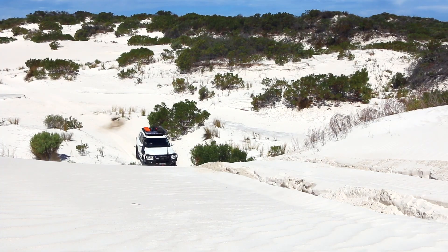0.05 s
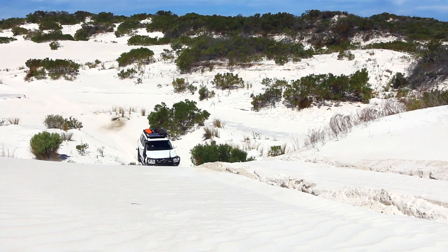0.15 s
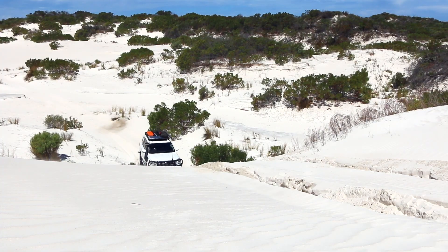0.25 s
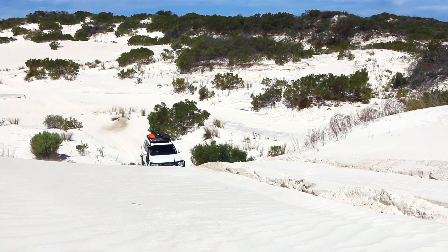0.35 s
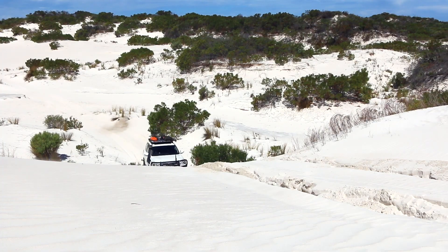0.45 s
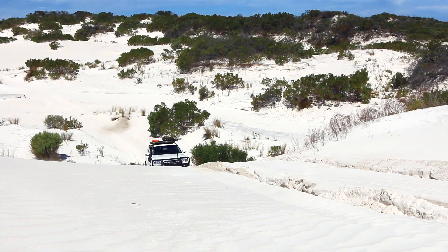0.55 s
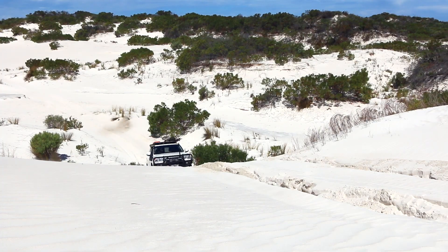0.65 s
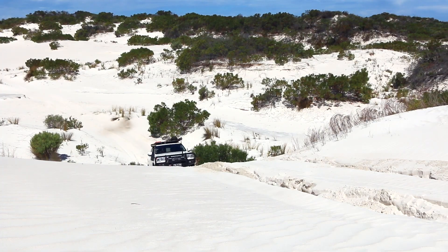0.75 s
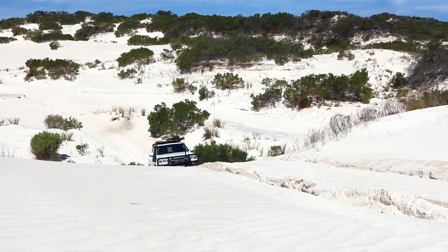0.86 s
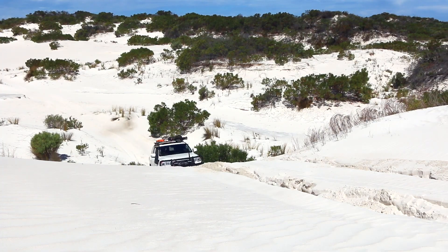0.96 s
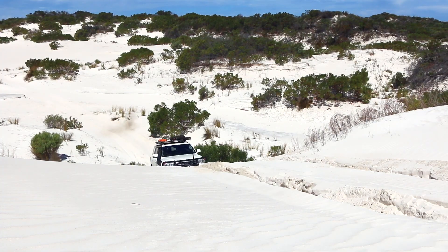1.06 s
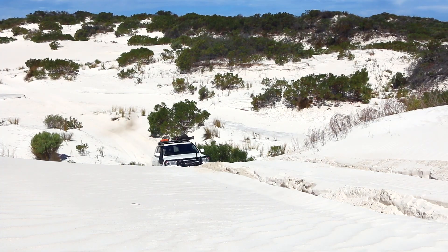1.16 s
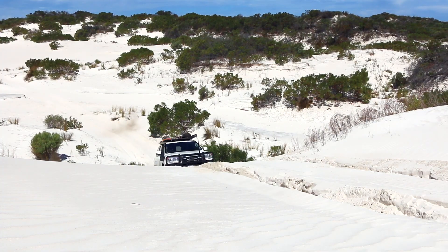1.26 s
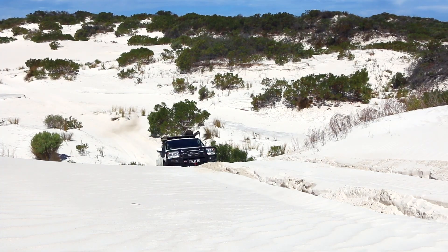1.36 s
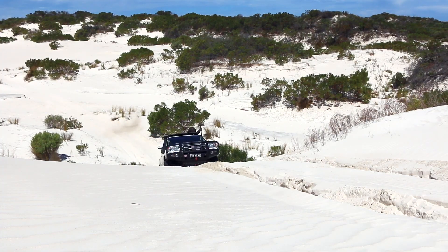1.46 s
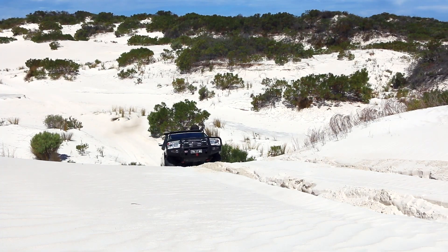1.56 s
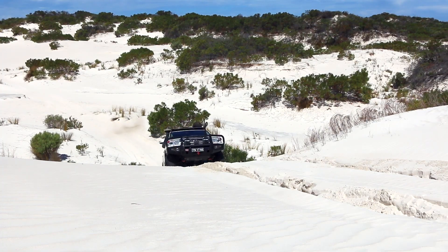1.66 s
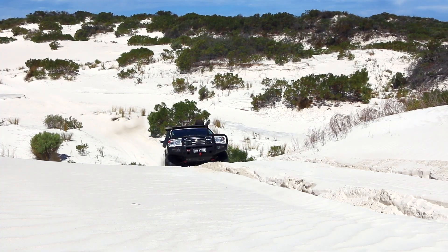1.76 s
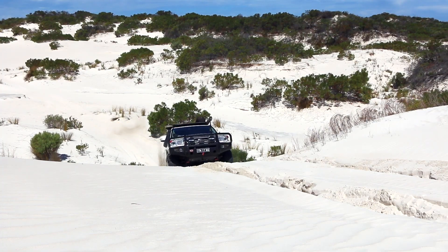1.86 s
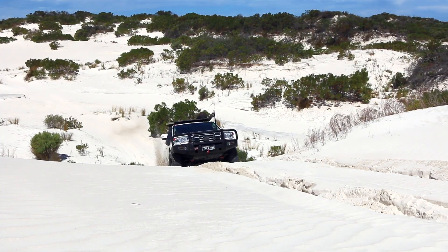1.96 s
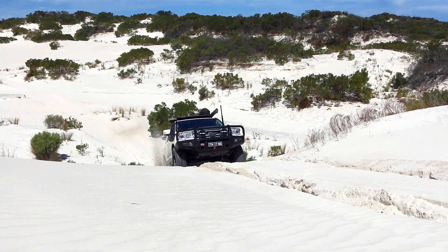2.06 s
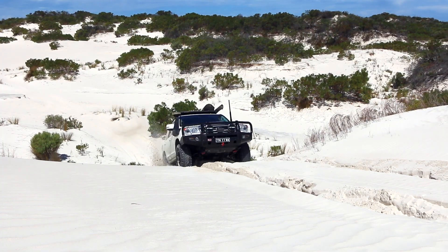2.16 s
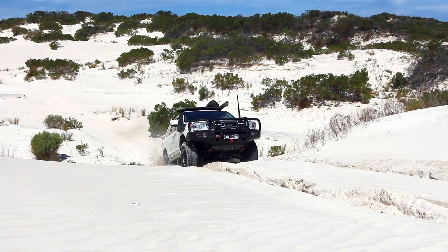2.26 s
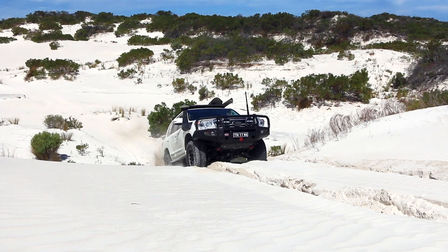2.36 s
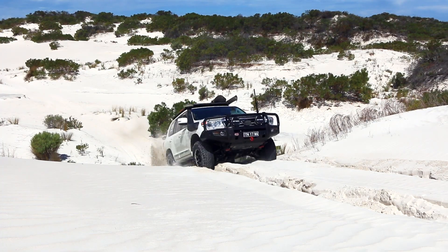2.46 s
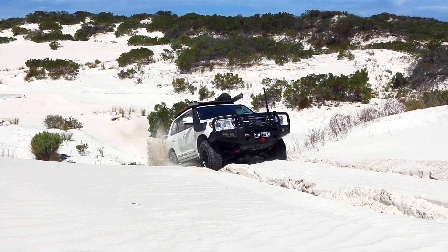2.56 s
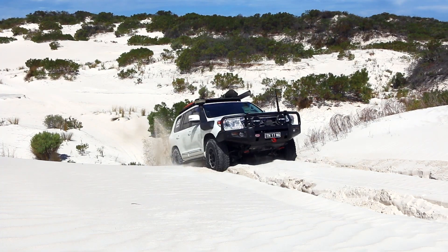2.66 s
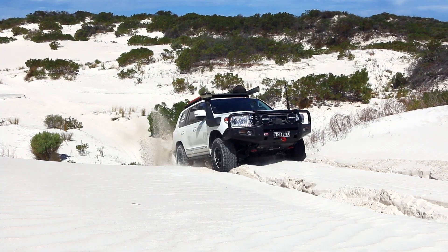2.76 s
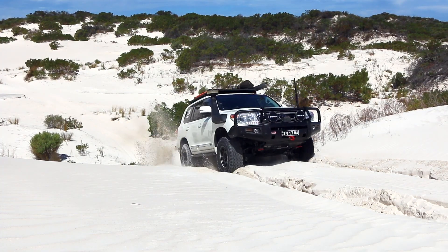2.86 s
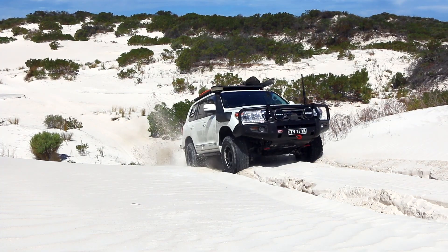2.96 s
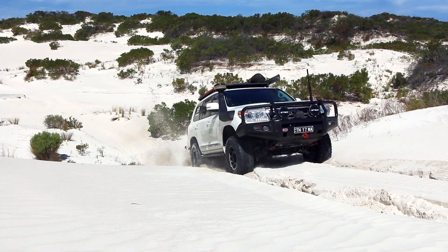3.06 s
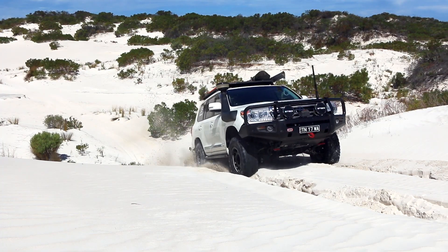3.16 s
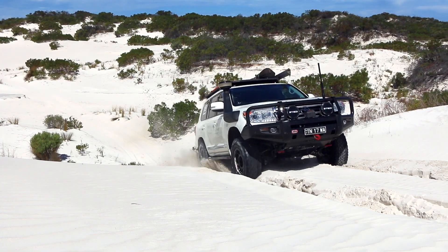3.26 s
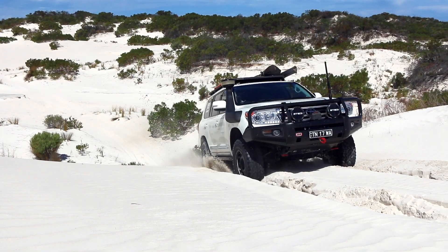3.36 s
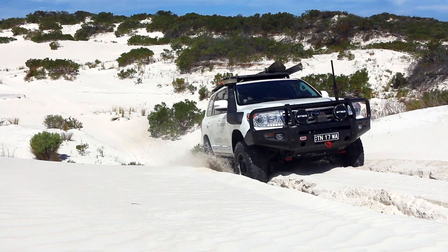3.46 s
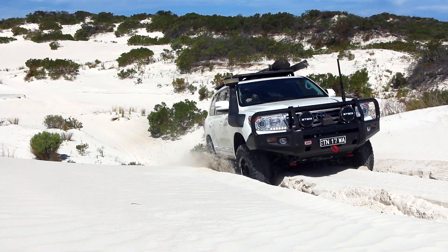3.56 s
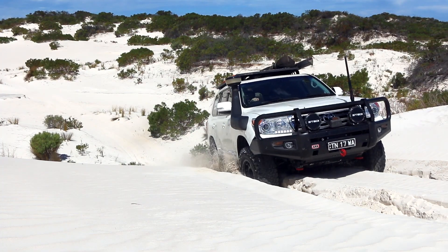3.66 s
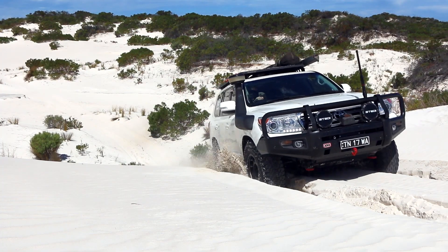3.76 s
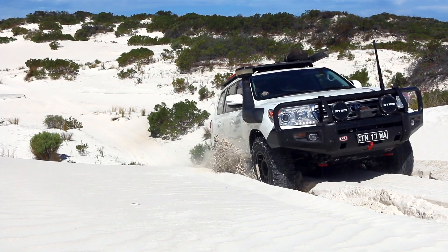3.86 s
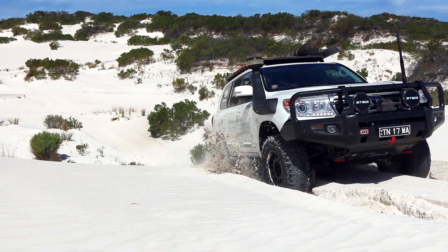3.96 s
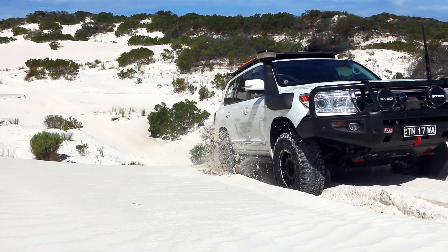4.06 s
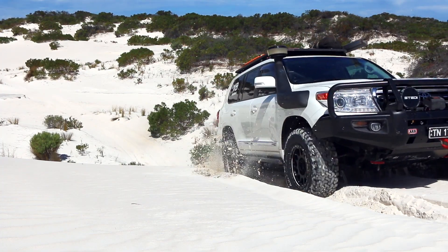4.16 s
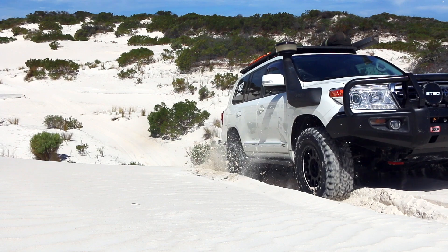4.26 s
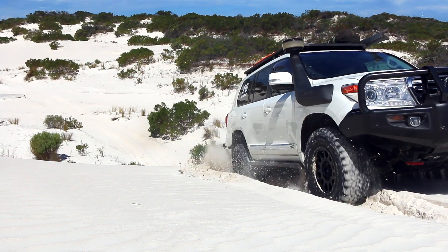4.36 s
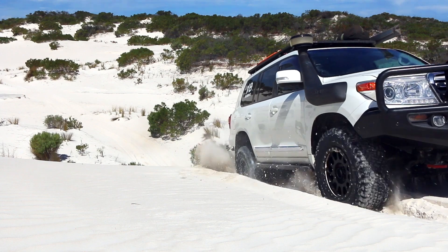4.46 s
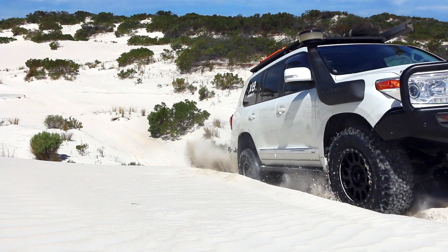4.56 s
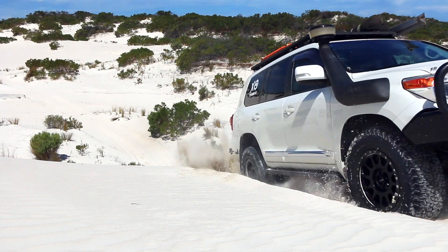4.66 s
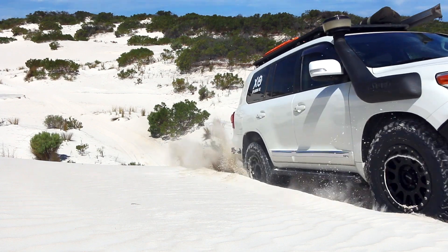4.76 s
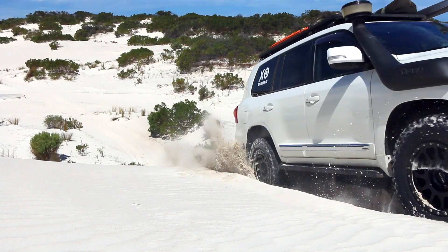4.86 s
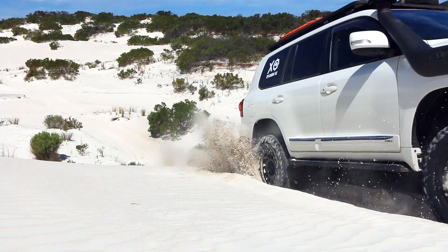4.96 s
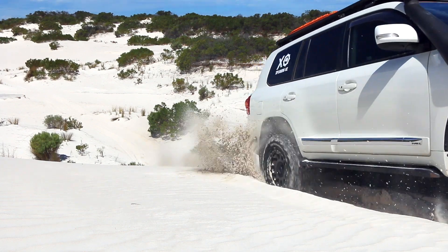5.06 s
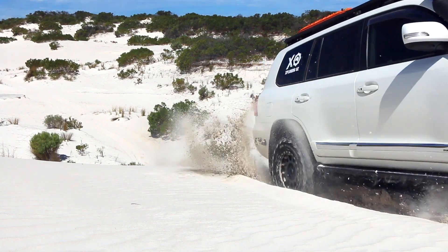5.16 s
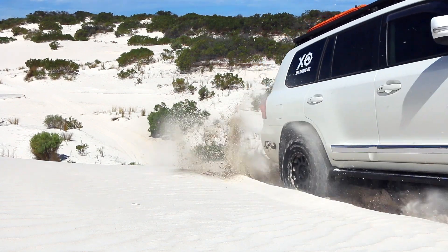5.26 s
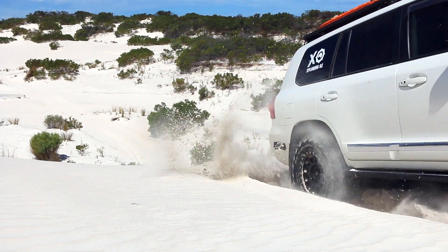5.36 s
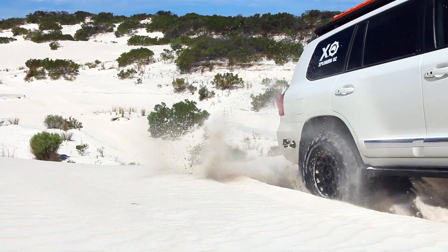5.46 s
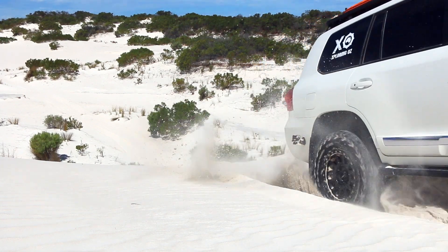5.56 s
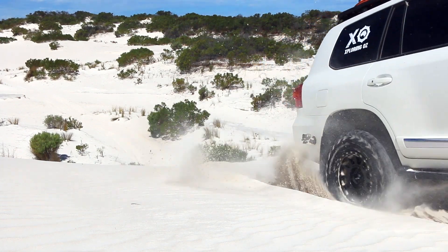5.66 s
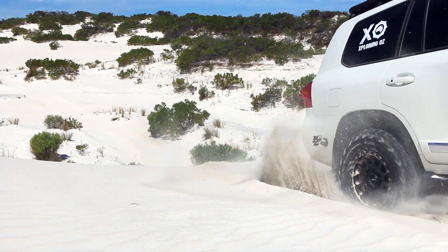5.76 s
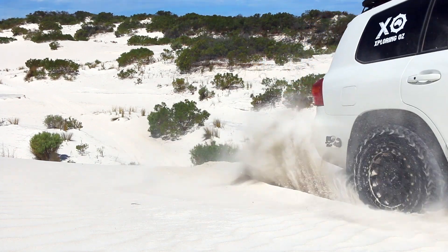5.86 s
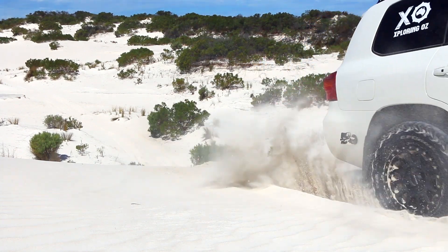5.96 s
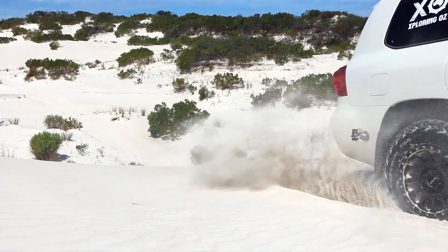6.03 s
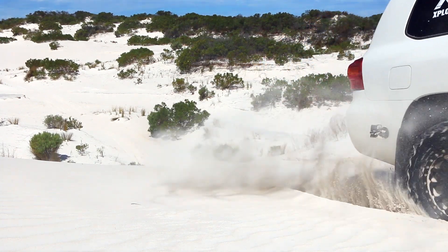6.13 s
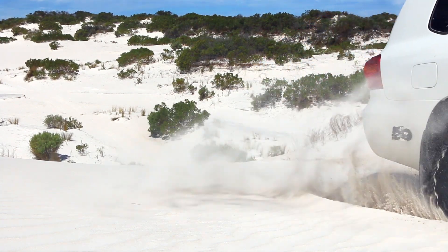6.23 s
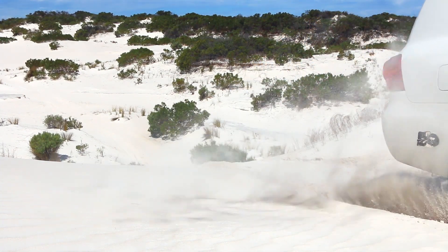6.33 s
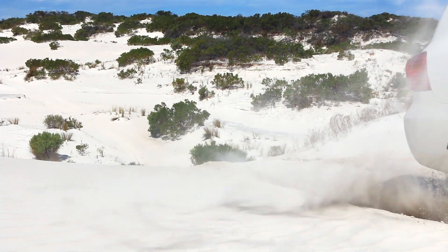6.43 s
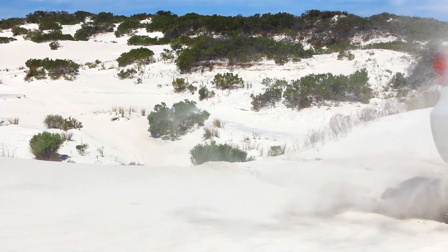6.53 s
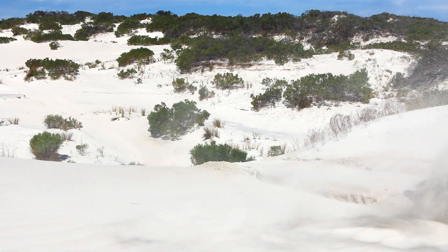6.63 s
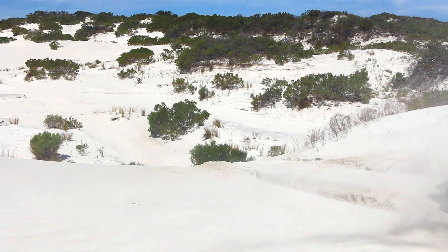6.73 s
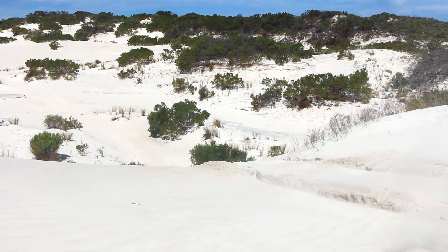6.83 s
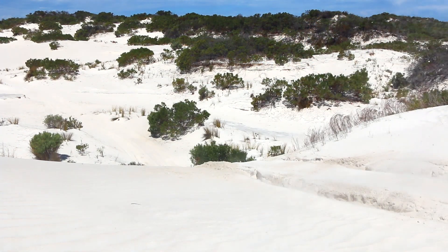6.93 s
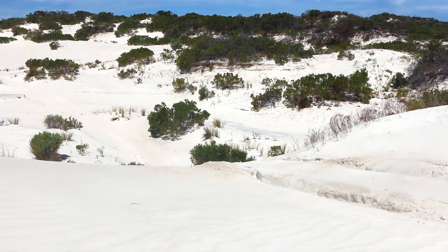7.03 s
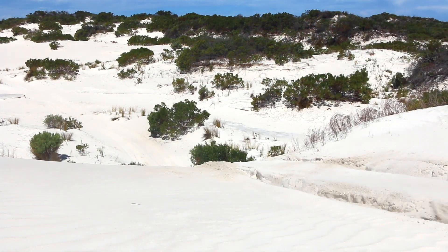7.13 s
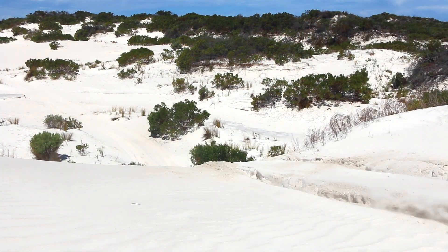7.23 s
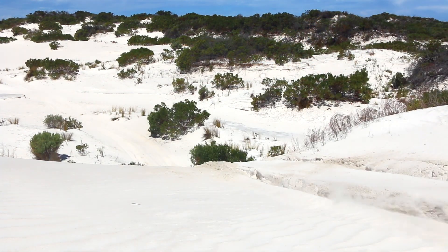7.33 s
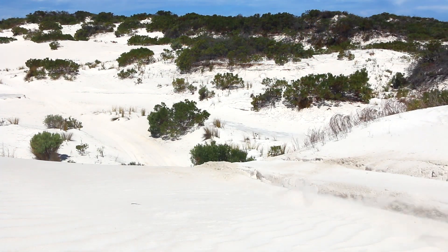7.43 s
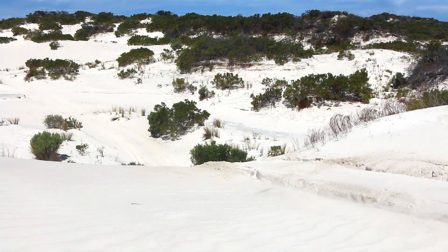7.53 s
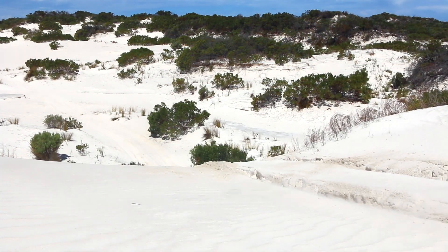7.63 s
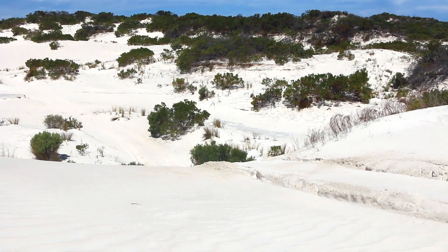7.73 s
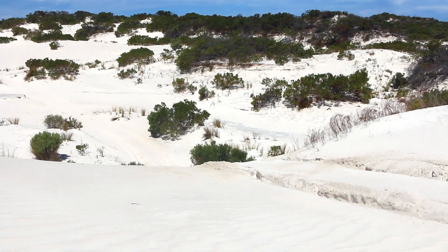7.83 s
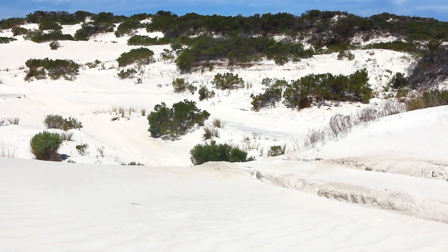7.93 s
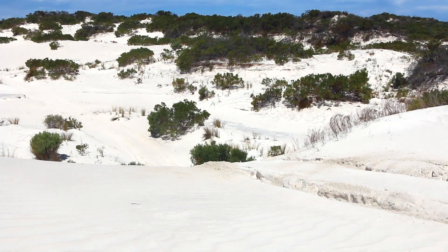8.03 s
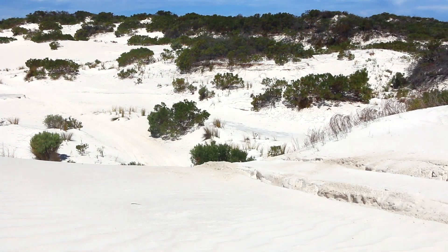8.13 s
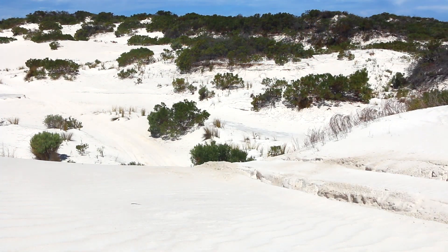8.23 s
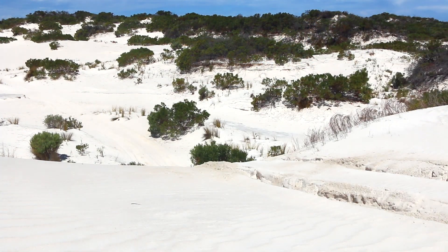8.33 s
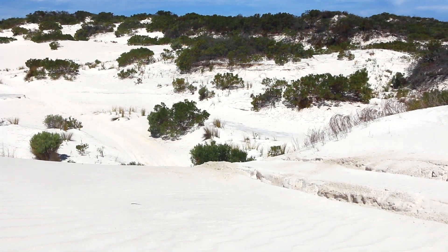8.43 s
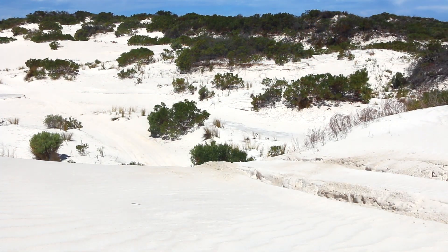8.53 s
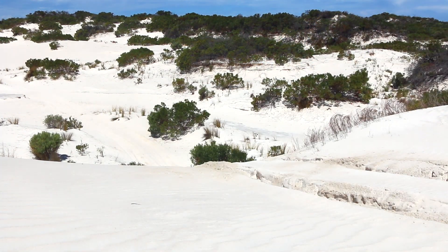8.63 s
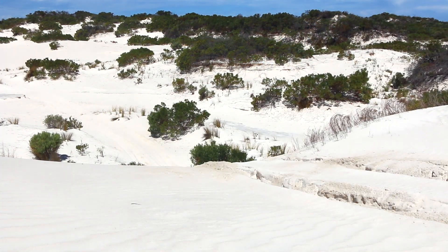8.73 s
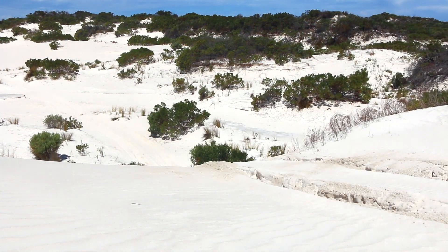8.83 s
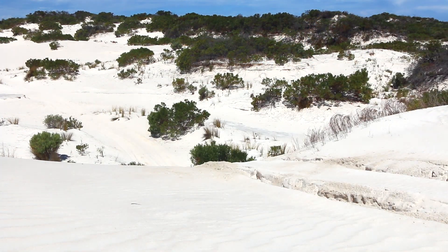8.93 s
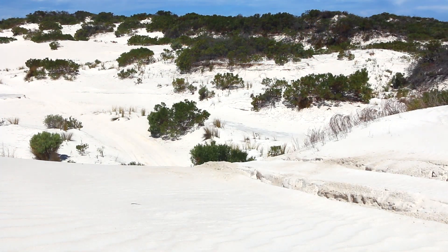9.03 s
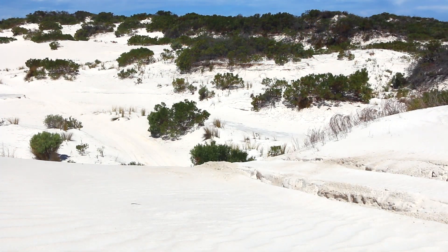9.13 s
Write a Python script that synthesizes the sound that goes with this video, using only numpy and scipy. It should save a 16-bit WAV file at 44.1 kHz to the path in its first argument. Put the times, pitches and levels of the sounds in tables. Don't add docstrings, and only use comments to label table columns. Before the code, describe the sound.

A heavy eight-cylinder diesel off-roader works through soft sand. First a ragged, distant low hum pulses up and down in pitch under gusty wind rumble. The roar swells and brightens over several seconds, sand sprays finely from the tyres at the closest point, then the rear exhaust crackles in rapid pops. It fades with a fizzing, whistling gas jet and a shifting hollow colour. One stationary outdoor microphone, dry open space.

```python
import sys
import numpy as np
from scipy import signal
from scipy.fft import rfft, irfft, next_fast_len
from scipy.io import wavfile
from scipy.ndimage import uniform_filter1d, map_coordinates

SR = 44100
rng = np.random.default_rng(int(sys.argv[2]) if len(sys.argv) > 2 else 0)


def natural_amplitude(level_db):
    exponent = np.asarray(level_db, float) / 20
    return 10 ** exponent


def pcm_store(signal):
    levels = np.round(np.clip(np.atleast_2d(signal), -1, 1) * 32767)
    wavfile.write(sys.argv[1], SR, levels.astype(np.int16).T)


N = 405271
TIME = np.arange(N) / SR


def unit(x):
    return x / np.sqrt(np.mean(x ** 2) + 1e-20)


def along(points, hz):
    f, v = np.transpose(points)
    return np.interp(np.log(hz + 1), np.log(f + 1), v)


def curves(rows):
    s, *cols = np.transpose(rows)
    return [np.interp(TIME, s, c) for c in cols]


def swells(rows):
    return sum(height * np.exp(-.5 * ((TIME - s) / half) ** 2) for s, half, height in rows)


def wobble(rate):
    return map_coordinates(rng.standard_normal(int(N * rate / SR) + 4), [TIME * rate])


def filtered(x, response):
    m = next_fast_len(N + SR // 4)
    return irfft(rfft(x, m) * response(np.fft.rfftfreq(m, 1 / SR)), m)[:N]


def rush(spectrum, patchy_db, gate=1):
    z = signal.stft(gate * rng.standard_normal(N), nperseg=512)[2]
    field = uniform_filter1d(rng.standard_normal(z.shape), size=3, axis=0)
    field = uniform_filter1d(field, size=16, axis=1)
    x = signal.istft(z * natural_amplitude(patchy_db * unit(field)), nperseg=512)[1][:N]
    return unit(filtered(x, lambda hz: natural_amplitude(along(spectrum, hz))))


def beats(cycle, place, width):
    return np.exp(-.5 * (((cycle - place + .5) % 1 - .5) / width) ** 2)


# centre in seconds, half length in seconds, rise in Hz.
REV_FLARES = [(0.169, 0.232, 15.4), (1.073, 0.126, 31.5), (1.268, 0.077, 21.4), (1.879, 0.166, 28.2),
              (2.498, 0.186, 31.9), (3.23, 0.198, 19.4), (3.688, 0.098, 10.8), (4.234, 0.112, 18.1),
              (4.645, 0.185, 15.4), (5.192, 0.109, 23.8), (5.775, 0.118, 12.0), (6.384, 0.109, 6.8),
              (7.342, 0.29, 2.0)]


def firing_rate():
    governed_hz = 188.5
    return governed_hz + swells(REV_FLARES)


# time in seconds, level in dB.
NOTE = [(0.0, -24.5), (0.47, -23.5), (0.59, -26.0), (1.87, -22.5), (2.64, -27.5), (3.41, -20.5),
        (3.79, -19.5), (4.03, -26), (4.08, -22.5), (5.25, -14), (5.42, -16.5), (6.34, -11), (8.0, -17),
        (8.74, -34.8), (8.74, -33.2), (8.85, -31), (8.9, -25.2), (9.19, -25.6)]


def note_db():
    db_per_hz = 0.1664
    return curves(NOTE)[0] + db_per_hz * swells(REV_FLARES)


# time in seconds, level in dB.
BAY = [(0, -55), (.67, -58), (1.1, -46.5), (1.48, -51.5), (1.76, -44.5), (2.07, -45.5), (2.66, -38.5),
       (2.97, -39.5), (3.22, -37), (3.66, -39.5), (4.2, -36), (4.79, -36.5), (5.07, -35.5), (5.37, -38.5),
       (5.58, -36.5), (6.58, -47), (7.6, -59.5), (9.19, -54.5)]
# time in seconds, level of the pops in dB.
TAIL = [
    (5.8, -62.5),
    (6.4, -42.5),
    (6.8, -37.5),
    (7.2, -34.5),
    (7.6, -34.5),
    (8, -35),
    (8.3, -37),
    (8.9, -43.5),
    (9.19, -45),
]


def heard(mix):
    full_bay_db = -36
    note, bay, tail = note_db(), curves(BAY)[0] - full_bay_db, curves(TAIL)[0]
    levels = []
    for over_note, at_full_bay, swing, over_tail in mix:
        power = natural_amplitude(2 * (note + over_note)) + natural_amplitude(2 * (at_full_bay + swing * bay)) + natural_amplitude(2 * (tail + over_tail))
        levels.append(10 * np.log10(power))
    return levels


# first order, last order, centre
# in seconds, half length in seconds, extra level in dB.
BOOMS = [(14, 14, 3.7, 0.19, -5), (14, 14, 4.55, 0.32, 10), (10, 12, 4.56, 0.19, -3), (14, 14, 2.5, .3, 4),
         (14, 14, 5.7, 0.13, 4.5), (16, 16, 0.86, .8, -9.5), (16, 16, 2.5, 0.35, 2),
         (13, 13, 4.45, 0.27, 4), (16, 16, 3.2, 0.51, 3), (16, 16, 4, 0.087, -17),
         (16, 16, 4.96, 0.25, -10), (9, 13, 1.03, 0.59, -4), (9, 13, 3.49, 0.19, -9.5),
         (21, 36, 1.6, 1.6, -8.5), (21, 36, 5.05, 0.2, -8.5), (21, 36, 5.9, 0.34, 2.5),
         (1, 7, 5.03, .25, -5.5), (15, 20, 5.3, 0.32, -4.5), (9, 36, 8.8, .35, -4.5),
         (21, 36, 8.5, .2, -3.5)]


def boom_db(order):
    return swells(row[2:] for row in BOOMS if round(row[0]) <= order <= round(row[1]))


# multiple of the four-stroke cycle, level in dB from the front, level in dB from behind.
ORDERS = [(1, -42.5, -47.5), (2, -26.5, -42.5), (3, -22.5, -24), (4, -9.5, -9.5), (5, -17.5, -17),
          (6, -17, -11.5), (7, -23.5, -29), (9, -22, -30), (10, -18.5, -11), (11, -25.5, -12.5),
          (12, -31.5, -19.5), (13, -24, -22), (14, -19.5, -20), (15, -19, -26), (16, -15.5, -17),
          (17, -27.5, -21.5), (18, -21.5, -24.5), (19, -28.5, -22.5), (20, -31, -19.5), (21, -24, -23),
          (22, -25, -26), (23, -28.5, -40), (24, -23, -17), (25, -33.5, -18.5), (26, -23, -12.5),
          (27, -33.5, -26.5), (28, -36, -22.5), (29, -36, -29), (30, -34.5, -37.5), (32, -42, -36.5),
          (36, -41, -23)]
# dB over the note, dB at full bay, swing with the bay in dB per dB, dB over the tail.
ORDER_MIX = [
    (-12.5, -30.5, 0.34, 6.5),
    (-13, -35, 0.55, 6),
    (-22.5, -30, 0.95, 7),
    (-25, -37, 0.6, 0),
]
STRONG_BLOWS = [
    (.41, 1),
    (.89, .8),
]
# frequency in Hz, level in dB per Hz.
DRONE = [(120, -35.5), (230, -4), (350, -2.5), (480, -6.5), (700, -31.5), (1500, -86.5)]


def exhaust_tone(cycle, firing_db):
    firing_phase = 2 * np.pi * 8 * cycle + .08 * wobble(25)
    out = np.sqrt(2) * natural_amplitude(firing_db + .5 * wobble(14)) * np.sin(firing_phase)
    behind = np.clip((TIME - 5) / .8, 0, 1)
    ragged = np.interp(TIME, [1.8, 3, 5, 6.2, 8.3, 8.7], [1.7, 1.4, 1.2, .25, .25, 1.5])
    groups = np.split(np.array(ORDERS), [7, 12, 19])
    group_levels = heard(ORDER_MIX)
    for group, group_db in zip(groups, group_levels):
        front, rear = (gain / np.linalg.norm(gain) for gain in natural_amplitude(group[:, 1:].T))
        for k, a, b in zip(np.round(group[:, 0]), front, rear):
            start = 2 * np.pi * rng.random()
            if k in (6, 10):
                start = np.pi / 2 * np.sign(8 - k)
            if k > 20:
                blows = sum(size * np.exp(-2j * np.pi * k * place) for place, size in STRONG_BLOWS)
                start = np.angle(blows) - np.arctan((k - 25) / 4)
            level = natural_amplitude(group_db + boom_db(k) + 1.6 * ragged * wobble(4))
            size = (a + (1.2 * b - a) * behind) * level
            out += np.sqrt(2) * size * np.cos(2 * np.pi * k * cycle + start + .6 * ragged * wobble(7))
    drone_db = group_levels[2] + boom_db(order=18) - 1.5 - 3.5 * behind
    return out + natural_amplitude(drone_db) * rush(DRONE, patchy_db=3.0)


# frequency in Hz, level in dB per Hz.
ROAR_COLOUR = [(290, -33.5), (500, -8), (650, -1), (900, -0.5), (1300, -1.5), (1700, -3.5), (2250, -8.5),
               (2700, -15), (3150, -14), (3750, -17.5), (4100, -26.5), (5300, -30), (12700, -42),
               (15700, -46)]
BAND_HZ = [784, 2410, 4780]
# dB over the note, dB at full bay, swing with the bay in dB per dB, dB over the tail.
ROAR_MIX = [
    (-26, -34.5, 2.3, 9),
    (-29, -32, 1.21, 2.5),
    (-58.5, -37, 0.97, -21.5),
    (-72, -51, 0.88, -29),
]
# layer (0 body, 1 block, 2 clatter, 3 hiss), centre in seconds,
# half length in seconds, extra level in dB.
FLARES = [(0, 0.48, .6, -4), (0, 3.18, 0.39, -7), (0, 5.9, 0.3, 6.5), (0, 8.88, 0.6, 4.5),
          (1, 5.4, 0.3, 4.5), (1, 1.12, .1, -5.5), (3, 1.05, .1, 3), (3, 3.22, .1, 2), (3, 5.1, .08, 3),
          (3, 1.76, .05, 1.5), (1, 9.26, .25, -3)]


def roar(cycle):
    firing_throb = 0.067 * np.cos(2 * np.pi * 8 * cycle)
    crank_throb = 0.046 * np.cos(2 * np.pi * 2 * cycle + wobble(2.8))
    gate = (1 + firing_throb + crank_throb) * natural_amplitude(0.45 * wobble(30))
    noise = rush(ROAR_COLOUR, patchy_db=1.16, gate=gate)
    lows = [filtered(noise, lambda hz: 1 / (1 + (hz / edge) ** 6)) for edge in BAND_HZ]
    bands = np.diff([0 * noise, *lows, noise], axis=0)
    bands[0] *= np.interp(TIME, [5.6, 6.4, 8, 8.5], [1, .45, .45, 1])
    out = []
    for k, (db, band) in enumerate(zip(heard(ROAR_MIX), bands)):
        flare_db = swells(row[1:] for row in FLARES if round(row[0]) == k)
        out.append(natural_amplitude(db + flare_db) * band / np.std(band[:SR]))
    return out


CYLINDER_DB = [0, -11, -12, -7, -3, -11, -12, -8]
# frequency in Hz, level in dB.
POP_COLOUR = [(300, -39.5), (600, -8.5), (900, 6), (1700, 2), (2300, -3.5), (3500, -28), (7000, -41),
              (16000, -62)]


def pops(cycle):
    firing = 8 * (cycle - .43)
    at = np.flatnonzero(np.diff(np.floor(firing)) > 0)
    cylinder = np.floor(firing[at + 1]).astype(int) % 8
    blows = np.zeros(N)
    blows[at] = natural_amplitude(np.take(CYLINDER_DB, cylinder) + 1.5 * rng.standard_normal(len(at)))
    crack = unit(filtered(blows, lambda hz: natural_amplitude(along(POP_COLOUR, hz)) * np.exp(-1j * np.arctan(hz / 600))))
    puff_s = .002
    trail = signal.lfilter([1], [1, -np.exp(-1 / (puff_s * SR))], blows)
    puff = rush(POP_COLOUR, patchy_db=1, gate=trail)
    return natural_amplitude(curves(TAIL)[0]) * (1.05 * crack + .5 * puff)


# place in the cycle from 0 to 1, level in dB.
PUFFS = [
    (0.361, 0.5),
    (.63, -4),
    (.97, -3.5),
]
# time in seconds, level of the fizz in dB.
JET = [
    (6.3, -72.5),
    (7.55, -73.5),
    (8.05, -63.5),
    (8.35, -57),
    (8.78, -57.5),
    (8.83, -51),
    (8.93, -66),
    (9.12, -65),
    (9.19, -57.5),
]
# frequency in Hz, level in dB per Hz.
FIZZ = [(3000, -45), (4800, -0.5), (6000, 0), (7500, -3), (10500, 2.5), (11800, 7), (12700, -8),
        (14100, -5.5), (15700, -16.5)]
# frequency in Hz, level in dB per Hz.
WHISTLE = [(2200, -50.5), (3200, -6), (3700, 0), (4100, -10.5), (4700, -16.5), (6000, -44.5)]
# centre in seconds, half length in seconds, extra level in dB.
WHISTLES = [
    (7.71, .08, 5.5),
    (8.35, .15, 8),
    (8.75, .15, 8),
    (9.03, 0.041, 2.5),
]


def jet(cycle):
    def puffs(lag):
        pulses = sum(natural_amplitude(db) * beats(cycle, place + lag, 0.031) for place, db in PUFFS)
        return (0.77 + pulses) * natural_amplitude(1.8 * wobble(45))

    fizz = rush(FIZZ, patchy_db=0.2, gate=puffs(0) ** 1.3)
    whistle = rush(WHISTLE, patchy_db=2.0, gate=puffs(.04))
    fizz_fade = np.clip((TIME - 5.5) / .4, 0, 1)
    whistle_fade = np.clip((TIME - 7.2) / 0.46, 0, 1)
    whistle_db = -56 + swells(WHISTLES) + 3
    return fizz_fade * natural_amplitude(curves(JET)[0] + 5) * fizz, whistle_fade * natural_amplitude(whistle_db) * whistle


# dB over the note, dB at full bay, swing with the bay in dB per dB, dB over the tail.
HOLLOW_MIX = [
    (-62.5, -36.5, 0.81, -40),
    (-60, -45, 1.1, -39.5),
]
# time in seconds, frequency in Hz.
INTAKE_HZ = [(0, 1290), (3.599, 1279), (4.099, 1210), (4.8, 1321), (5.301, 1190), (5.8, 1283), (6.6, 1266)]
# centre in seconds, half length in seconds, extra level in dB.
GULPS = [
    (3.25, 0.37, 9),
    (3.772, .06, 8),
    (4, 0.05, 7),
    (5.055, 0.15, 12.5),
    (6.197, 0.47, 10.5),
]
# centre in seconds, half length in seconds, extra level in dB.
COVER_RINGS = [
    (1.13, 0.15, 11.5),
    (1.9, .08, 8),
    (2.6, 0.19, 6),
    (3.501, 0.22, -15),
    (4.2, 0.1, 2),
    (4.85, 0.051, 6),
]


def hollow():
    width_hz, cover_hz = 90, 2120
    intake_db, cover_db = heard(HOLLOW_MIX)
    cavities = [(intake_db + swells(GULPS), curves(INTAKE_HZ)[0]),
                (cover_db + swells(COVER_RINGS), np.full(N, cover_hz))]
    out = 0
    for db, centre_hz in cavities:
        a, b = (filtered(rng.standard_normal(N), lambda hz: 1 / (1 + (hz / width_hz) ** 2)) for _ in "ab")
        turn = 2 * np.pi * np.cumsum(centre_hz) / SR
        out = out + natural_amplitude(db - 3.0) * unit(a * np.cos(turn) + b * np.sin(turn))
    return np.clip((6.7 - TIME) / 0.33, 0, 1) * out


# time in seconds, level in dB.
SPRAY = [
    (4.9, -75),
    (5.3, -52),
    (5.7, -46.5),
    (6.1, -54.5),
    (6.6, -58),
    (7.2, -61.5),
    (7.9, -61.5),
    (8.3, -76),
]
# frequency in Hz, level in dB per Hz.
GRIT = [(3000, -41.5), (3900, -2), (4600, -0.5), (5400, -11.5), (7000, -32), (12000, -58.5)]


def spray():
    return natural_amplitude(curves(SPRAY)[0]) * rush(GRIT, patchy_db=1.0, gate=natural_amplitude(2.5 * wobble(300)))


# centre in seconds, half length in seconds, extra level in dB.
GUSTS = [(.2, .15, 2.5), (1, 0.67, 4.5), (1.87, 0.19, 6.5), (2.35, 0.064, -9), (3.35, 0.26, -4.5),
         (3.82, 0.16, 5), (4.3, .35, 3), (5.95, 0.5, -4), (7, .12, 8), (7.6, 0.088, -4), (7.73, .05, 8),
         (8, 0.13, -2), (8.62, 0.12, 6)]
# frequency in Hz, level in dB per Hz.
BUFFET = [(10, -46.5), (25, -21), (45, -7.5), (76, -2), (110, -3), (160, -5.5), (260, -12.5), (500, -38.5),
          (2000, -100)]


def wind():
    level_db = -31 + swells(GUSTS) + 2.5
    return natural_amplitude(level_db) * unit(natural_amplitude(1.7 * wobble(16)) * rush(BUFFET, patchy_db=-0.5))


def off_sand(x, path_ms, share, dull_hz):
    dull = filtered(x, lambda hz: 1 / (1 + (hz / dull_hz) ** 4))
    late = np.interp(TIME - path_ms / 1000, TIME, dull)
    return (x + share * late) / np.sqrt(1 + share ** 2)


# time in seconds, delay in milliseconds.
BODY_PATH = [(6, .25), (6.5, .28), (7.2, .33), (7.55, .42), (7.75, .5), (8.1, .62), (8.65, .75), (8.9, .92),
             (9.19, 1.3)]
# time in seconds, share from 0 to 1.
SAND_SHARE = [(6, 0.05), (6.8, 0.4), (7.2, 0.6), (7.8, 0.68), (8.3, 0.5), (8.8, 0.6), (9.19, 0.55)]


def scene():
    cycle = np.cumsum(firing_rate() / 8) / SR
    *block, hiss = roar(cycle)
    fizz, whistle = jet(cycle)
    body = off_sand(sum(block) + pops(cycle), curves(BODY_PATH)[0], share=curves(SAND_SHARE)[0], dull_hz=2400)
    jet_path_ms = .21 + .143 * np.clip(TIME - 7.2, 0, None)
    jet_share = .65 * np.clip((TIME - 7.2) / .5, 0, 1)
    gas = off_sand(hiss + fizz, jet_path_ms, share=jet_share, dull_hz=11500)
    vehicle = exhaust_tone(cycle, note_db()) + body + hollow() + spray() + gas + whistle
    return (vehicle + wind())[None]


def top_cut(x):
    return signal.sosfilt(signal.butter(12, 15710, fs=SR, output="sos"), x)


def record(dry):
    ceiling = .575
    held = dry / (1 + np.abs(dry / ceiling) ** 12) ** (1 / 12)
    return top_cut(held)


dry = scene()
out = record(dry)
pcm_store(out)
```